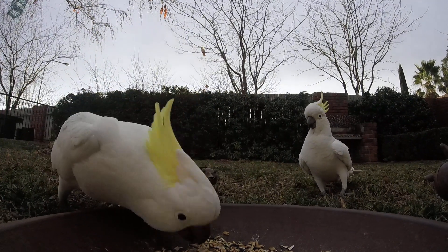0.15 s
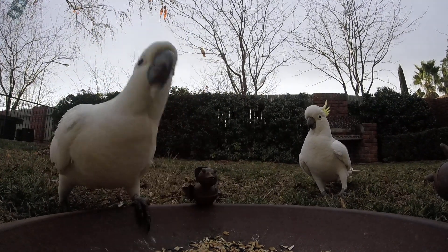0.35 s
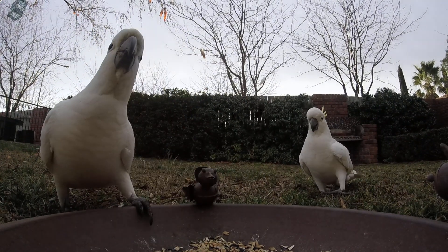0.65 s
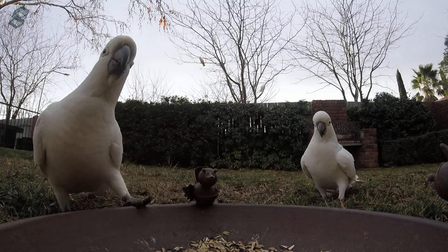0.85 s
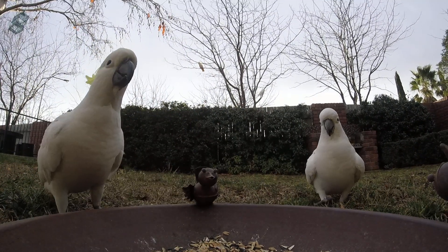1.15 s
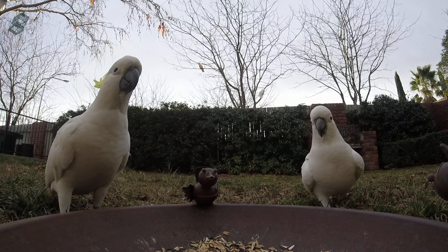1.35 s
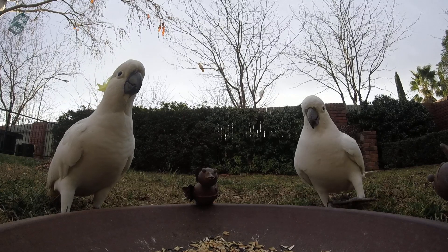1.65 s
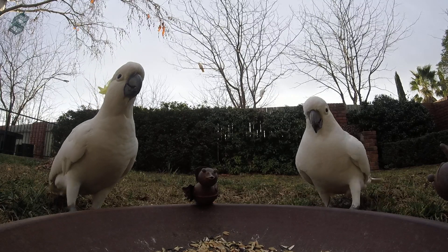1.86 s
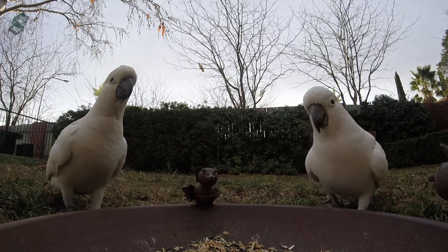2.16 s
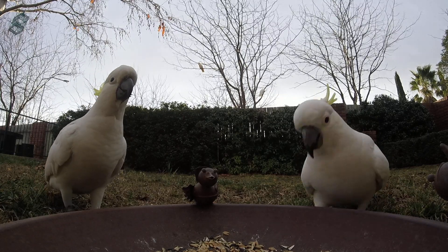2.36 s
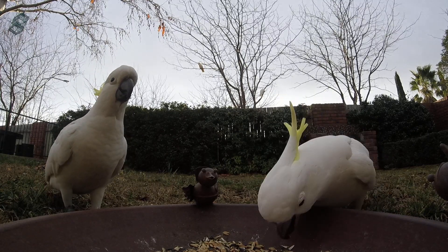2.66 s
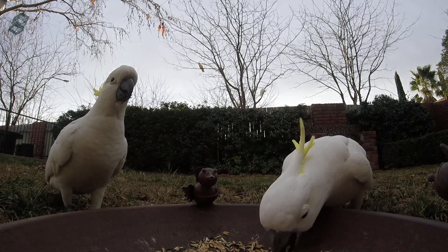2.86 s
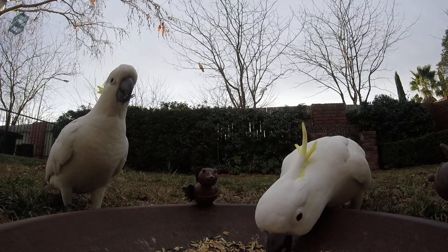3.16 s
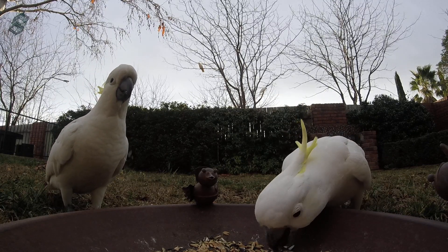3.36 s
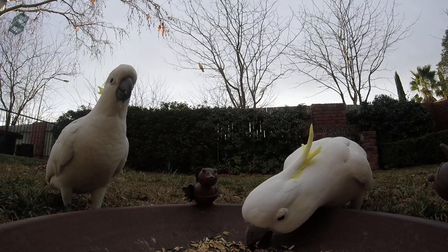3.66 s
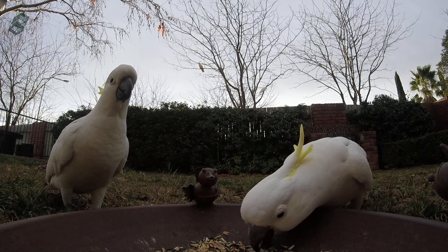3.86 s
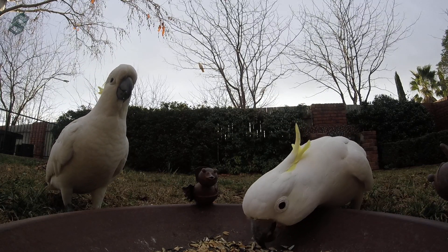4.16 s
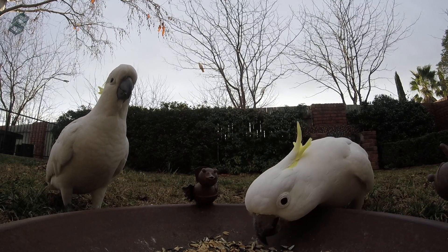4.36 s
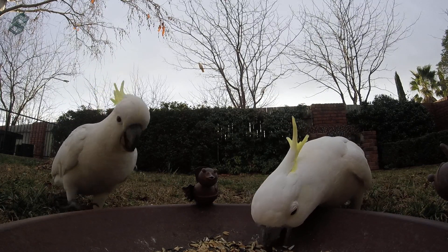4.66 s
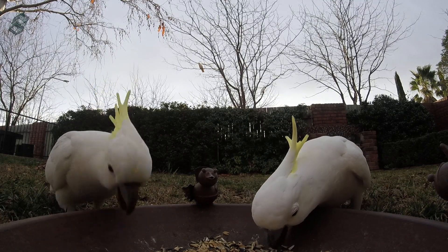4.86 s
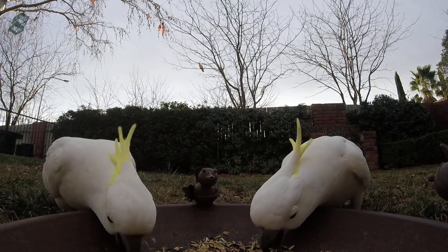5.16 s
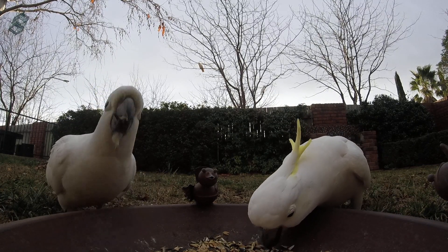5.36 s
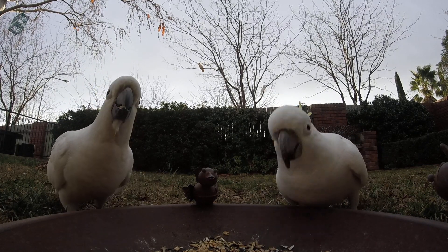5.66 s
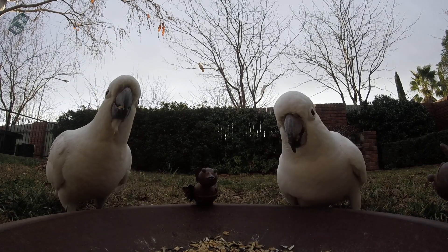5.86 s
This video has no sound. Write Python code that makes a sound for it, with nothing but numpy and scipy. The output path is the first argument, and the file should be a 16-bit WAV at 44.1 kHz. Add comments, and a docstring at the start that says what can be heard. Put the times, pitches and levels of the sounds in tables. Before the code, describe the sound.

Right at the microphone, a seed bowl rocks and booms under a large parrot's beak, its low ring fading slowly. A juddering claw scrape on the rim ends in a bright snap. After a lull with only faint garden air, thin ticks and one soft rustle, the birds peck lightly at the bowl several times. A stronger knock and click set it ringing again shortly before the end.

```python
"""Cockatoos at a seed bowl

Two cockatoos feed from a wide, shallow bowl in a quiet garden, very close to the microphone.
Beaks knock on the bowl, which rocks, booms and rings in decaying modes. A claw drags along the rim,
sticking and slipping, and comes off with a sharp click. Between the blows there is only faint
outdoor air, a few tiny ticks and one soft rustle, all filtered noise."""
import sys
import numpy as np
from scipy import signal
from scipy.fft import rfft, irfft, next_fast_len
from scipy.io import wavfile

SR = 44100
rng = np.random.default_rng(int(sys.argv[2]) if len(sys.argv) > 2 else 0)


def pcm_store(signal):
    """Save signal as 16-bit PCM."""
    levels = np.round(np.clip(np.atleast_2d(signal), -1, 1) * 32767)
    wavfile.write(sys.argv[1], SR, levels.astype(np.int16).T)


N = 265305
TIME_S = np.arange(N) / SR
SHORT_S = TIME_S[:SR // 3]
CUTOFF_HZ = 15300

# Each row: mode in Hz, t60 in seconds, gain in dB for a knock, gain in dB for a rim touch.
# Close pairs beat.
BOWL_MODES = [(33.1, 1.5, -10.5, -61), (41, 0.28, 3, -65), (84.96, 3.4, -5.5, -50.5),
              (126.36, 1.67, 3, -43), (142.25, 3.01, -1.5, -33), (150.5, 0.99, 1, -46),
              (200.8, 2.3, -22, -44), (226, 0.32, -18.5, -36.5), (301, 1.3, -32.5, -47),
              (365.4, 0.6, -28.5, -32), (391.6, 1.2, -29.5, -47.5), (513.6, 0.65, -30, -31),
              (605, 0.32, -23.5, -32.5), (878, 0.22, -26, -27.5), (972, 0.26, -24, -33),
              (1216, 0.14, -18.5, -40.5), (1279, 0.14, -18.5, -10), (1400, 0.13, -3.5, -9),
              (1440, 0.052, 2.5, -18.5), (1490, 0.17, -12, -5.5), (1489, 0.3, -13, -14.5),
              (1566, 0.22, -15.5, -12), (1732, 0.095, -19, -10.5), (1899, 0.17, -23, -21),
              (2220, 0.13, -22.5, -13.5), (2560, 0.12, -23.5, -9), (2814, .17, -29.5, -14.5),
              (2992, 0.14, -18.5, -25), (2967, .13, -22, -22.5), (3056, 0.019, -2.5, -11.5),
              (3155, 0.11, -31, -23.5), (3307, 0.1, -41.5, -14.5), (4960, 0.27, -43.5, -37.5),
              (6200, .15, -35, -38.5), (6060, 0.13, -34.5, -38)]
# Each row: start in seconds, rocking in dB, boom in dB, boom tilt in dB/octave, ring in dB.
BLUNT_KNOCKS = [(0.008, -23.5, -24.5, 14, -24), (0.213, -9, -11, 3, -7.5), (1.018, -30, -40, -9, -44),
                (1.086, -46, -39.5, 2.5, -58), (3, -24, -45.5, -15.5, -35), (3.290, -31, -43, -1.5, -39),
                (3.872, -46, -77, -3, -59), (3.918, -32, -42.5, 6.5, -57), (4.133, -32, -46, 11, -38.5),
                (4.930, -31, -55, -11, -74), (5.2027, -23.5, -30, 8.5, -15), (5.418, -43, -61, 38.5, -42.5)]
# Harder knocks ring brighter. Each row: ring in dB, tilt in dB/octave.
RING_TILTS = [(-43, -12), (-22.5, 1)]
# Each row: start in seconds, level in dB, tilt in dB/octave.
RIM_CLICKS = [(0.009, -22.5, -6.5), (0.0578, -32, 11.5), (0.081, -30, 5.5), (0.489, -39.5, -11.5),
              (0.512, -35.5, -4.5), (0.694, -43, 2.5), (0.919, -28.5, -7.5), (1.059, -20.5, -5.5),
              (1.0859, -13, 1.5), (1.104, -21, 0.5), (3.524, -38, -0.5), (4.902, -30, 1), (5.206, -30, 3),
              (5.249, -41.5, 6.5)]
# Each row: start in seconds, length in seconds, initial level in dB, swell in dB, ring low-pass in Hz,
# grit against ring in dB, judder depth in dB.
RIM_STROKES = [(0.071, 0.18, -40.5, -6.5, 3604, -11.5, 2.5), (0.692, 0.046, -45, 5.5, 7000, -41, 11),
               (0.741, 0.21, -45.5, 8, 1850, -33, 17), (1.006, 0.095, -35.5, 12.5, 3800, -27, 2.5)]
# Most come in pairs. Each row: start in seconds, level in dB.
DRY_TICKS = [(2.118, -54), (2.148, -56), (3.003, -59), (3.311, -57), (4.118, -55.5), (4.141, -56.5),
             (5.911, -53.5), (5.945, -55.5)]

# Spectra of the noisy parts. Each row: frequency in Hz, relative density in dB.
AIR_SPECTRUM = [(12, -24), (20, 9.5), (42, -7), (66, -1.5), (87, 1), (119, 0), (129, 1), (161, -2.5),
                (298, -6), (581, -10.5), (725, -11.5), (2210, -18.5), (2400, -18), (13500, -38),
                (15500, -55)]
KNOCK_SPECTRUM = [(150, -20.5), (300, -15.5), (600, -7.5), (750, -8), (1050, -9.5), (1400, 6.5),
                  (1650, -14.5), (2000, -9), (2650, -26), (3000, -17.5), (3500, -18), (5400, -30.5),
                  (6200, -32), (7200, -40), (10500, -41.5), (13000, -70)]
RIM_SPECTRUM = [(250, -24.5), (1140, -22), (1290, 7.5), (1600, -1), (2100, -9), (2550, 3.5), (3250, -5),
                (3600, -21), (5400, -23.5), (6300, -18), (7000, -30.5), (8800, -36), (10200, -32.5),
                (14000, -58)]
SNAP_SPECTRUM = [(1500, -8), (3000, 11.5), (4000, 10.5), (4700, -8), (6100, 13), (7000, 3), (8500, -5.5),
                 (10200, 8), (11500, -19.5), (15000, -21.5)]
TICK_SPECTRUM = [(3500, -45), (5000, -12), (5900, -2), (7000, -15), (8500, -14), (11000, -30), (15000, -47)]
RUSTLE_SPECTRUM = [(1200, -13), (2100, 4.5), (2700, 9), (3300, 5.5), (4300, -7), (8000, -44)]


def from_db(db):
    return 10 ** (np.asarray(db) / 20)


def unit_rms(x):
    return x / np.sqrt(np.mean(x ** 2) + 1e-20)


def decay(time_s, t60_s):
    """Falls 60 dB in t60_s."""
    return np.exp(-np.log(1000) * time_s / t60_s)


def add(out, start_s, sound):
    start = max(round(start_s * SR), 0)
    out[start:start + len(sound)] += sound[:N - start]


def tilt_gain(hz, tilt_db_oct, pivot_hz=1450, low_hz=520, high_hz=7000):
    """Harder contact tilts the spectrum towards the treble."""
    return from_db(tilt_db_oct * np.log2(np.clip(hz, low_hz, high_hz) / pivot_hz))


def shaped(x, spectrum, tilt_db_oct=0):
    """Minimum-phase filter; untilted, it keeps the power of white noise."""
    size = 2 * next_fast_len(len(x))
    hz = np.maximum(np.fft.rfftfreq(size, 1 / SR), 1)
    points_hz, points_db = np.transpose(spectrum)
    curve_db = np.interp(np.log(hz), np.log(points_hz), points_db)
    gain = unit_rms(from_db(curve_db)) * tilt_gain(hz, tilt_db_oct)
    cepstrum = irfft(np.log(gain))
    cepstrum[1:size // 2] *= 2
    cepstrum[size // 2 + 1:] = 0
    return irfft(rfft(x, size) * np.exp(rfft(cepstrum)))[:len(x)]


def burst(t60_s, rise_s=0.00078):
    """Dying noise; horn on a bowl takes a moment to make full contact."""
    return rng.standard_normal(len(SHORT_S)) * decay(SHORT_S, t60_s) * (1 - np.exp(-SHORT_S / rise_s))


def air(level_db=-55):
    """Steady outdoor air, strongest in the bass."""
    return from_db(level_db) * shaped(rng.standard_normal(N), AIR_SPECTRUM)


def bowl_modes(rise_s=0.0015, rise_cycles=0.54):
    """One row per mode, ringing from a unit blow; low modes swell more slowly."""
    time_s = TIME_S[:2 * SR]
    hz, t60_s = np.array(BOWL_MODES).T[:2, :, None]
    swell = 1 - np.exp(-(time_s / (rise_s + rise_cycles / hz)) ** 2)
    return swell * np.sin(2 * np.pi * hz * time_s) * decay(time_s, t60_s)


def grip_damping(time_s, start_s=0.22, length_s=0.33, loss_db_per_s=52):
    """A bird holds the rim for a while and damps a knock's ring."""
    held_s = np.clip(time_s - start_s, 0, length_s)
    return from_db(-loss_db_per_s * (held_s - held_s[0]))


def knocks(modes, crack_db=-8, tail_db=-19):
    """Beak or foot rocks the bowl on its base, booms the shell, rings the wall and bounces once."""
    rock_below_hz, boom_below_hz, boom_pivot_hz = 60, 260, 130
    bounce_s, bounce_db, bounce_above_hz = 0.046, -14, 2400
    hz, _, mode_db, _ = np.transpose(BOWL_MODES)
    out = np.zeros(N)
    for start_s, rock_db, boom_db, boom_tilt_db_oct, ring_db in BLUNT_KNOCKS:
        tilt_db_oct = np.interp(ring_db, *np.transpose(RING_TILTS))
        boom = from_db(boom_db + boom_tilt_db_oct * np.log2(hz / boom_pivot_hz))
        ring = from_db(ring_db) * tilt_gain(hz, tilt_db_oct)
        drive = np.select([hz < rock_below_hz, hz < boom_below_hz], [-from_db(rock_db), boom], ring)
        damping = grip_damping(start_s + TIME_S[:modes.shape[1]])
        add(out, start_s, (drive * from_db(mode_db)) @ modes * damping)
        bounce = ring * (hz > bounce_above_hz) * from_db(mode_db + bounce_db)
        add(out, start_s + bounce_s, bounce @ modes)
        # Countless weaker modes blur into a crack and a short tail.
        blur = from_db(crack_db) * burst(t60_s=0.047) + from_db(tail_db) * burst(t60_s=0.28)
        add(out, start_s, from_db(ring_db) * shaped(blur, KNOCK_SPECTRUM, tilt_db_oct))
    return out


def wall_ring(t60_at_3khz_s=0.19, spread_db=13.5, count=260):
    """Many close wall modes of uneven strength; higher ones die sooner."""
    hz = np.geomspace(1000, 14000, count) * (1 + 0.004 * rng.standard_normal(count))
    strengths = unit_rms(from_db(spread_db * rng.uniform(-1, 1, count)))
    gains = strengths * np.sqrt(2 * hz / hz.sum())
    phases = 2 * np.pi * (hz[:, None] * SHORT_S + rng.random((count, 1)))
    t60_s = t60_at_3khz_s * (hz[:, None] / 3000) ** -0.25
    return gains @ (np.sin(phases) * decay(SHORT_S, t60_s))


def rim_ring(modes, wall, tilt_db_oct, crack_db, modes_db):
    """A sharp rim touch drives mainly high modes, each with a sign set by where it lands."""
    hz, _, _, touch_db = np.transpose(BOWL_MODES)
    signs = rng.choice([-1, 1], len(hz))
    drive = from_db(touch_db + modes_db) * tilt_gain(hz, tilt_db_oct) * signs
    ring = drive @ modes[:, :SR]
    crack = from_db(crack_db) * burst(t60_s=0.035)
    add(ring, 0, shaped(crack + wall, RIM_SPECTRUM, tilt_db_oct))
    return ring


def clicks(modes, wall, snap_wall_db=-12, untilted_snap_db=-20, snap_db_per_tilt=2.6):
    """Claw or beak tip snaps against the rim: a crack over its ring, stronger in brighter clicks."""
    out = np.zeros(N)
    for start_s, level_db, tilt_db_oct in RIM_CLICKS:
        snap = burst(t60_s=0.037) + from_db(snap_wall_db) * wall * decay(SHORT_S, t60_s=0.72)
        snap_db = level_db + untilted_snap_db + snap_db_per_tilt * tilt_db_oct
        ring = rim_ring(modes, wall, tilt_db_oct, crack_db=0, modes_db=-2)
        add(out, start_s, from_db(level_db) * ring)
        add(out, start_s, from_db(snap_db) * shaped(snap, SNAP_SPECTRUM))
    return out


def stroke(start_s, length_s, swell_db, judder_db, catches_per_s=22.6, rise_share=0.11):
    """Envelope of one stroke: it swells or eases, and judders as the tip catches and lets go."""
    attack_s, release_s = 0.022, 0.0076
    age_s = TIME_S - start_s
    contact = np.exp(np.minimum(age_s, 0) / attack_s - np.maximum(age_s - length_s, 0) / release_s)
    progress = np.clip(age_s / length_s, 0, 1)
    judder = np.interp((catches_per_s * age_s) % 1, [0, rise_share, 1], [-0.5, 0.5, -0.5])
    return contact * from_db(swell_db * progress + judder_db * judder)


def scrapes(modes, wall, slips_per_s=800, spread_db=3):
    """A dragged tip sticks and slips at random; each slip rings the rim and adds a gritty crack."""
    signs = rng.choice([-1, 1], N)
    sizes = from_db(spread_db * np.clip(rng.standard_normal(N), -2, 2))
    slips = unit_rms(signs * sizes * (rng.random(N) < slips_per_s / SR))
    ring = rim_ring(modes, wall, tilt_db_oct=-3, crack_db=2, modes_db=1)
    grit = shaped(burst(t60_s=0.054), SNAP_SPECTRUM)
    out = np.zeros(N)
    for start_s, length_s, level_db, swell_db, dull_hz, grit_db, judder_db in RIM_STROKES:
        force = from_db(level_db) * stroke(start_s, length_s, swell_db, judder_db) * slips
        grit_force = from_db(grit_db) * (TIME_S >= start_s) * force
        low_pass = signal.butter(2, dull_hz, fs=SR, output="sos")
        dull_ring = signal.sosfilt(low_pass, ring)
        for drive, response in ((force, dull_ring), (grit_force, grit)):
            out += signal.fftconvolve(drive, response / np.linalg.norm(response))[:N]
    return out


def ticks():
    """Thin ticks, perhaps seed husks cracking, that leave the bowl still."""
    out = np.zeros(N)
    for start_s, level_db in DRY_TICKS:
        add(out, start_s, from_db(level_db) * shaped(burst(t60_s=0.032), TICK_SPECTRUM))
    return out


def rustle(start_s=2.65, length_s=0.38, level_db=-61):
    """Soft noise swells and fades as a bird leans in."""
    swell = np.sin(np.pi * np.clip((TIME_S - start_s) / length_s, 0, 1))
    return from_db(level_db) * swell * shaped(rng.standard_normal(N), RUSTLE_SPECTRUM)


def scene():
    """Mono mix at one close microphone."""
    modes = bowl_modes()
    wall = from_db(-13) * wall_ring()
    bowl = knocks(modes) + clicks(modes, wall) + scrapes(modes, wall)
    return (bowl + ticks() + air() + rustle())[None]


def record(dry):
    """Clips at full scale, then cuts the top treble."""
    low_pass = signal.ellip(10, 0.1, 90, CUTOFF_HZ, fs=SR, output="sos")
    return signal.sosfilt(low_pass, np.clip(dry, -1, 1))


dry = scene()
out = record(dry)
pcm_store(out)
```